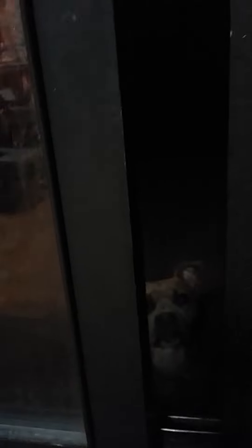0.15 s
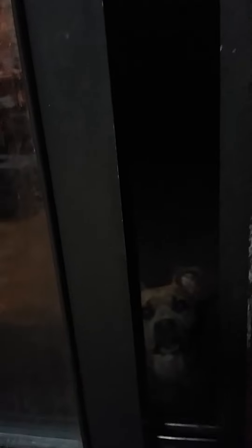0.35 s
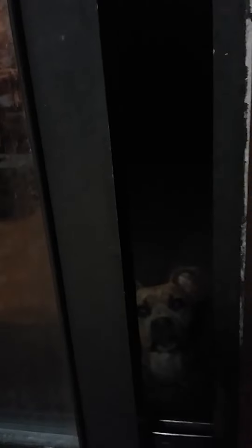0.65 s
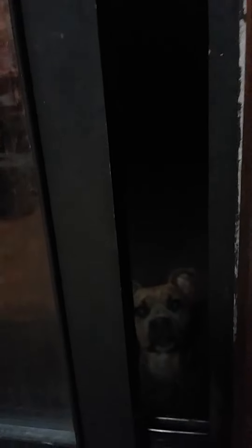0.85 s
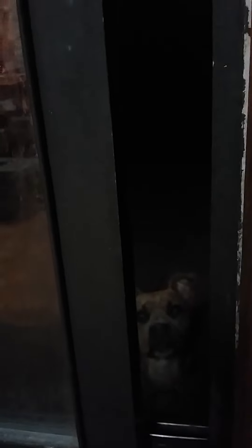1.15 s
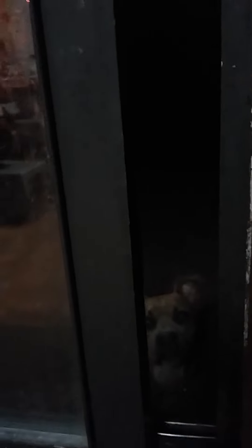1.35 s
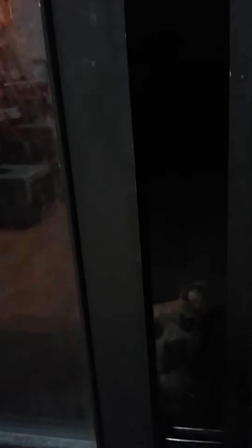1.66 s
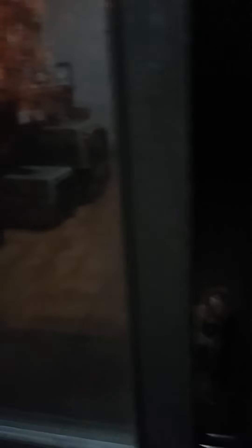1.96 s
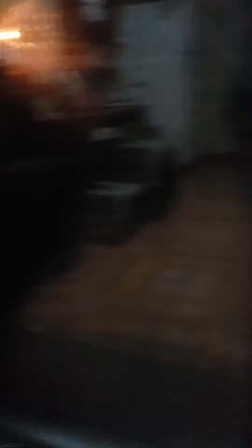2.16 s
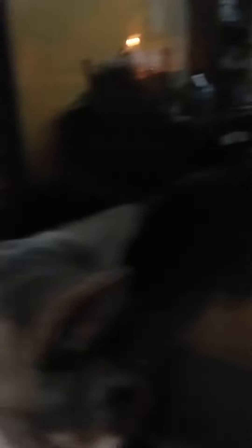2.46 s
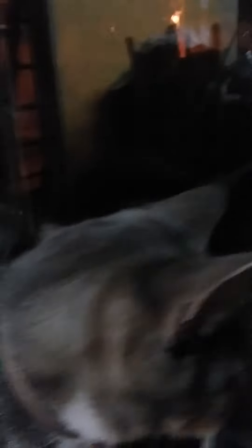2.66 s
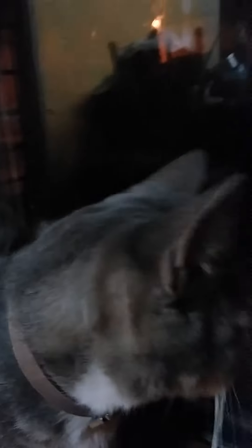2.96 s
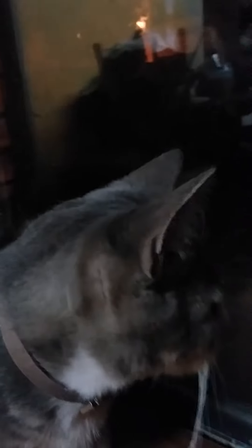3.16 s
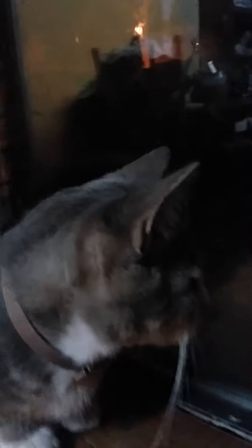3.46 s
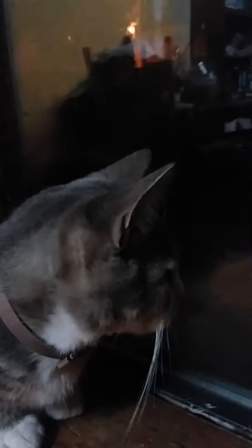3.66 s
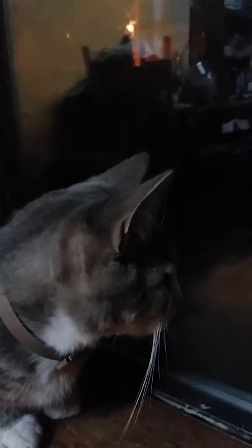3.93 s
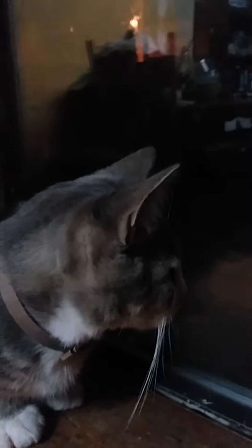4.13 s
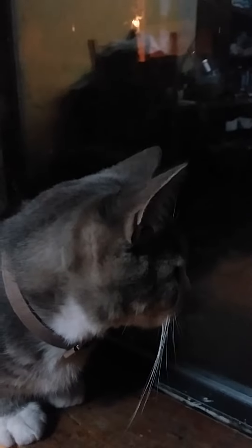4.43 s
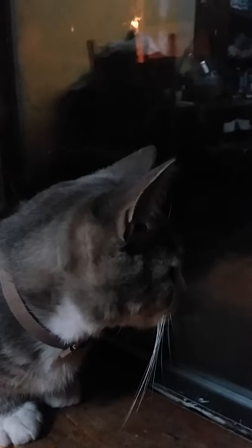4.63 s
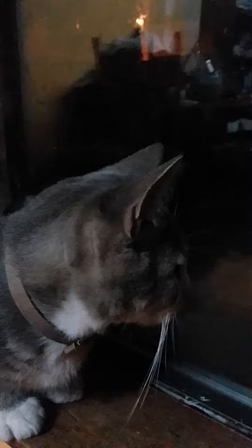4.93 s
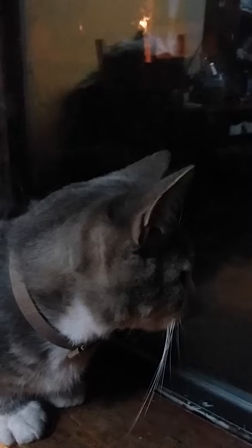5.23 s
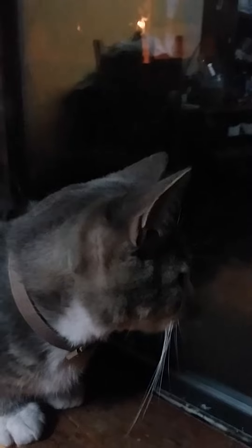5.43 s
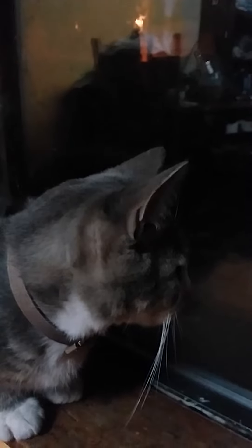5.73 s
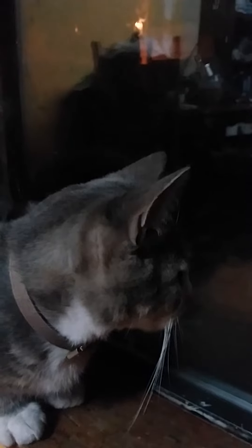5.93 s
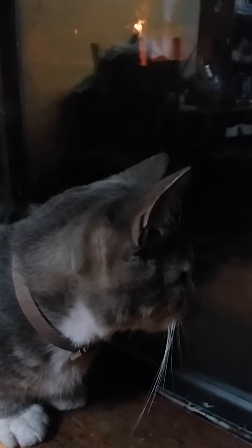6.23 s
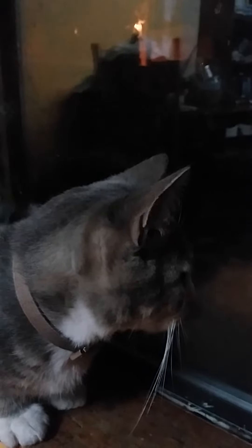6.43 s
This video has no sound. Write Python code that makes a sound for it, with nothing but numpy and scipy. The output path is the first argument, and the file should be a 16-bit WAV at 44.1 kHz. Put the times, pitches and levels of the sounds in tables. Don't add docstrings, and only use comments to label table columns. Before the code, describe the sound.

Four loud firecracker bangs in a night street, heard through a door ajar, each slapping off house fronts and fading into low town rumble.

```python
import sys
import numpy as np
from scipy import signal
from scipy.fft import rfft, irfft, next_fast_len
from scipy.io import wavfile
from scipy.ndimage import uniform_filter1d

SR = 44100
rng = np.random.default_rng(int(sys.argv[2]) if len(sys.argv) > 2 else 0)


def output_pcm(signal):
    pcm = np.clip(np.atleast_2d(signal).T, -1, 1) * 32767
    wavfile.write(sys.argv[1], SR, np.round(pcm).astype(np.int16))


def gain_from_db(level_db):
    decades = np.asarray(level_db, float) / 20
    return 10 ** decades


N = 290619
LONG = next_fast_len(N)

# (time [s], peak [dB], pitch [Hz])
NEAR_BLASTS = [
    (1.12816, -.9, 740),
    (2.68369, -1.3, 720),
    (4.48556, -1.8, 720),
    (5.96479, -1.5, 740),
]
# (crack [dB], first 25 ms of scatter [dB], treble from the back row of houses [dB])
BLAST_FRONTS = [(-16, -7.5, -1), (-26, 1, 5.5), (-29.5, 1, 2), (-22, 3.5, 2.5)]
# (scatter [dB], tilt [dB per octave], treble [dB], treble linger [dB per s])
DOOR_GAP = [(-18.5, -0.5, 7.5, -3), (-20, 1, 2, -2.5), (-18, 0, 3, 9.5), (-21.5, 0.43, 4.5, -6)]
# (centre [Hz], width [Hz], level [dB])
GRIP = [
    [(900, 320, 3), (1500, 180, -2), (2450, 600, -3.5), (2970, 300, 1), (5130, 470, 3.5), (5670, 330, -4)],
    [(1460, 300, -3), (1900, 600, 3.5), (2530, 180, 2), (4100, 320, -6), (4690, 330, 1.5), (5050, 250, -6)],
    [(1250, 180, -3), (1500, 280, 2), (2940, 400, -2), (4700, 360, 2.5), (5750, 460, 0), (6700, 400, -0.5)],
    [(380, 94, -0.5), (2340, 350, 3), (4000, 240, -5), (4600, 400, 3.5), (6100, 360, -3), (6570, 370, 6.5),
     (9000, 500, 3)],
]
PLACES_M = [2.2, .1, -2, -.4]
# (frequency [Hz], level [dB per Hz])
BLAST_COLOUR = [(20, -47), (70, -16.5), (150, -13), (300, -1.5), (480, -2), (780, -2), (1050, -6),
                (1400, -12), (2400, -15.5), (3200, -22), (5000, -26.5), (7000, -28), (10000, -27.5),
                (16000, -41)]
# (delay [s], extra delay up the street [s per m], pitch [Hz], length [cycles], sign)
MIRRORS = [
    (.00286, -.00008, 700, .9, 1),
    (.0959, .001, 650, 1.3, -1),
    (.2289, .0015, 1550, .75, 1),
]
# (sill [dB], far wall [dB], end wall [dB])
RETURN_LEVELS = [(-13, -6.5, -19), (-8, -9, -15.5), (-8, -7.5, -19), (-14, -9, -23)]
# (time [s], peak [dB], pitch [Hz], length [cycles])
SLAPS = [(1.133, -32.5, 2950, 5.5), (1.155, -15, 520, 1.4), (1.172, -13.5, 890, 2.5),
         (1.173, -29, 3030, 5.6), (1.185, -11.5, 740, 3), (1.233, -16, 450, 2.1), (1.243, -22, 790, 3),
         (1.255, -18, 744, 3.3), (2.192, -43, 287, 2), (2.692, -4.5, 1410, 0.72), (2.722, -8, 710, 1.25),
         (2.741, -10, 710, 0.88), (3.200, -38, 400, 0.72), (4.493, -15, 1200, 0.67), (4.525, -18, 800, 2.5),
         (4.536, -21.5, 800, 1.8), (4.585, -20, 600, 1), (4.711, -22, 5000, 0.82),
         (5.973, -5.5, 1320, 0.45), (5.977, -15, 696, 0.8), (6.004, -9, 740, 1.8), (6.016, -10, 756, 1),
         (6.384, -40, 450, 1.1), (6.429, -37, 500, 0.8)]
# (first bounce [s], gap [s], peak [dB], pitch [Hz], length [cycles])
FLUTTERS = [
    (1.9222, 0.0142, -34.5, 218, 1.8),
    (3.246, .0245, -40, 1300, 1.1),
]
# (delay [s], spread [s], body [dB], treble [dB])
HOUSE_ROWS = [
    (.010, .005, 3.5, 1),
    (0.049, .011, 3, 4.5),
    (.086, .008, -2, -0.5),
    (.11, .02, 0.5, 0.5),
    (.152, .022, 3.5, 1),
]
# (time [s], level [dB], tilt [dB per octave],
# t60 [s], ringing [Hz])
POPS = [(1.696, -58, 5, 0.12, 6000), (3.955, -62, 8.5, 0.51, 1780), (5.210, -57.5, 4.5, 0.21, 2650),
        (5.230, -57.5, 4, .3, 6700), (5.554, -54.5, 7.5, 0.28, 6700), (5.595, -59, 4, 0.4, 6700),
        (5.889, -58, 4.5, 0.31, 6500), (6.445, -53, 3, .2, 6700), (6.539, -47, 4, 0.31, 1590),
        (6.540, -52, 2.5, 0.24, 3530), (6.540, -67, -1, 0.28, 6800), (3.244, -49, 0.5, 1.2, 1400)]
# (time [s], peak [dB], pitch [Hz], scatter [dB], tilt [dB per octave])
FAR_THUMPS = [
    (1.9118, -26.5, 228, -48, -6.5),
    (3.242, -34.5, 302, -50, 0),
    (6.424, -39.5, 400, -59, 6),
]
# (time [s], level [dB])
TOWN_LEVEL = [(0, -56), (.95, -56.5), (1.12, -59.5), (1.7, -60), (2.15, -53), (2.67, -57.5), (3.5, -54),
              (3.8, -59), (4.15, -57), (4.47, -59.5), (5.2, -54), (5.5, -60.5), (5.85, -53), (6.59, -57.5)]
# (frequency [Hz], level [dB per Hz])
TOWN_COLOUR = [(20, -24), (50, -20), (80, -12.5), (108, -4.5), (150, -6.5), (320, -1), (400, -8.5),
               (860, -14), (1000, -19.5), (1600, -24), (2100, -30.5), (3050, -35), (3500, -39),
               (20000, -67.5)]
# (centre [Hz], width [Hz], level [dB])
TOWN_HUM = [(2750, 230, 3), (440, 80, 1.5)]
# (frequency [Hz], level [dB per Hz])
HISS_COLOUR = [(20, -29.5), (2000, -4), (4000, -0.5), (7000, -0.5), (11000, 2.5), (16000, 2.5),
               (22000, 0.5)]
# (centre [Hz], width [Hz], level [dB])
ROOM = [(72, 99, 2.5), (199, 9.9, 0), (314, 19, 4), (498, 30, 1.5), (620.4, 21, 3.5), (690, 22, 2.5),
        (776, 34, 1.5), (885, 37, 1.5), (1780, 58, 0.5), (2300, 150, 1.5), (2650, 60, -0.5),
        (2900, 150, -1.5)]
# (frequency [Hz], level [dB])
PHONE = [(15, -37.5), (60, 1), (2950, 0.5), (3250, -5.5), (4080, -11.5), (4450, -9), (4900, -9),
         (5600, -10.5), (6200, -12.5), (6800, -9.5), (7600, -14), (11000, -22.5), (14000, -33),
         (22000, -38)]
BANDS_HZ = 45 * 2. ** np.arange(9)

PULL_S = .02
STREET_S = 1.1
AIR_DB_PER_S = 42
BUILD_S, BUILD_DB = 0.011, -4
BODY_DB, BODY_DB_PER_S = 1, 70
TOP_DB, TOP_HOLD_S, TOP_DB_PER_S = -4, 0.21, 102.5
LATE_DB, LATE_DB_PER_S = -12.5, 36
BACK_ROW_S, BACK_ROW_SPREAD_S = .15, 0.03
STREET_END_S, STREET_END_DB = 0.27, -2
LEDGE_DB = -3
FLUTTER_LOSS_DB = 1.5
TICK_S, TICK_DB, TICK_HZ, TICK_CYCLES = 2.1615, -42, 1700, .7
LOW_RING_DB, HIGH_RING_DB = 11, 5
FAR_TREBLE_DB = -26
RUMBLE_TOP_DB, HISS_DB = 3, -83
EARLIER_BLAST_S = -.9
GAIN_HOLD_S, GAIN_RISE_S, GAIN_LIFT_DB, GAIN_FALL_S = 1.19, 0.55, 8, .35
TOWN_FOLLOWS_GAIN, TOP_FOLLOWS_GAIN = 0.76, .1


def slope(spectrum, count):
    hz = np.fft.rfftfreq(count, 1 / SR) + 1e-3
    at, db = np.transpose(spectrum)
    return hz, np.interp(np.log(hz), np.log(at), db)


def colour(x, spectrum, peaks=()):
    hz, gain_db = slope(spectrum, count=len(x))
    for centre, width, top in peaks:
        gain_db += top * np.exp(-.5 * (2 * (hz - centre) / width) ** 2)
    shaped = rfft(x) * gain_from_db(gain_db)
    return shaped / np.std(irfft(shaped, len(x))), hz


def octaves(shaped, hz, count):
    place = np.clip(np.log2(hz / BANDS_HZ[0]), 0, len(BANDS_HZ) - 1)
    return [irfft(shaped * np.maximum(1 - abs(place - k), 0), count) for k in range(len(BANDS_HZ))]


def walk(rate, count):
    hold = int(SR / rate)
    steps = np.repeat(rng.standard_normal(count // hold + 1), hold)
    return 0.91 * uniform_filter1d(steps, hold)[:count]


def add(out, s, x):
    i = int(s * SR)
    out[i:i + len(x)] += x[:len(out) - i]


def gain_lift(t):
    lift = np.zeros(len(t))
    for s in [EARLIER_BLAST_S] + [row[0] for row in NEAR_BLASTS]:
        since = t - s
        held = np.interp(s, t, lift)
        creep = GAIN_LIFT_DB * (1 - np.exp(-np.maximum(since - GAIN_HOLD_S, 0) / GAIN_RISE_S))
        lift = np.where(since > 0, creep + held * np.exp(-abs(since) / GAIN_FALL_S), lift)
    return lift


def night():
    t = np.arange(LONG) / SR
    body = np.interp(t, *np.transpose(TOWN_LEVEL))
    lift = gain_lift(t)
    shaped, freqs = colour(rng.standard_normal(LONG), TOWN_COLOUR, ROOM + TOWN_HUM)
    town = 0
    for hz, band in zip(BANDS_HZ, octaves(shaped, freqs, count=LONG)):
        db = body + TOWN_FOLLOWS_GAIN * lift
        db = db + (hz > 1000) * (RUMBLE_TOP_DB + TOP_FOLLOWS_GAIN * lift)
        swell = min(600 / hz, 1.5) * walk(14, count=LONG)
        flicker = 1.1 * walk(55, count=LONG)
        town = town + band * gain_from_db(db + swell + flicker)
    hiss = irfft(colour(rng.standard_normal(LONG), HISS_COLOUR)[0], LONG) * gain_from_db(HISS_DB + lift)
    return town[:N], hiss[:N]


def blast(hz, cycles):
    t = np.arange(-PULL_S * SR, .02 * SR) / SR * hz
    swell = np.exp(-.5 * ((t + .17) / (.44 * cycles)) ** 2)
    front = np.clip((t + .8 * cycles) / (.3 * cycles), 0, 1)
    return -swell * front * np.cos(2 * np.pi * t)


def street(t, bright):
    body = BODY_DB - BODY_DB_PER_S * t + BUILD_DB * np.clip(1 - t / BUILD_S, 0, 1)
    top = TOP_DB - TOP_DB_PER_S * np.maximum(t - TOP_HOLD_S, 0)
    for lag, spread, body_db, top_db in HOUSE_ROWS:
        bump = np.exp(-.5 * ((t - lag) / spread) ** 2)
        body = body + body_db * bump
        top = top + top_db * bump
    early = (1 - bright) * body + bright * top
    early = early + STREET_END_DB * np.clip((t - STREET_END_S) / .02, 0, 1)
    late = LATE_DB - LATE_DB_PER_S * t
    return 10 * np.log10(gain_from_db(early) ** 2 + gain_from_db(late) ** 2)


def scatter(db, tilt, treble_db, early_db, peaks, linger_db=0, back_db=0, grain_db=1.5, patchy_db=1.0):
    count = next_fast_len(int(STREET_S * SR))
    t = np.arange(count) / SR
    echoes = rng.standard_normal(count) * gain_from_db(grain_db * walk(700, count=count))
    start = gain_from_db(early_db * np.clip((.032 - t) / .012, 0, 1)) * np.minimum(t / .001, 1)
    back_row = np.exp(-.5 * ((t - BACK_ROW_S) / BACK_ROW_SPREAD_S) ** 2)
    out = 0
    for hz, band in zip(BANDS_HZ, octaves(*colour(echoes, BLAST_COLOUR, peaks), count=count)):
        bright = np.clip(np.log2(hz / 800) / 3.05, 0, 1)
        fade = street(t, bright) - AIR_DB_PER_S * (hz / 9870.0) ** 2 * t
        fade += back_db * bright * back_row
        tone = tilt * np.log2(hz / 700) + treble_db * (hz > 4000) + linger_db * bright * t
        out = out + band * gain_from_db(db + tone + fade + patchy_db * walk(40, count=count))
    return out * start


def near_crackers():
    out = np.zeros(N)
    for shot, gap, front, grip in zip(NEAR_BLASTS, DOOR_GAP, BLAST_FRONTS, GRIP):
        s, db, hz = shot
        wet_db, tilt, treble_db, linger_db = gap
        crack_db, early_db, back_db = front
        add(out, s - PULL_S, gain_from_db(db) * blast(hz, 1))
        add(out, s - PULL_S + .0016, -gain_from_db(-13) * blast(310, 1.1))
        crack = blast(3100, 1.2) + blast(5200, 1.2) + blast(7200, 1.2)
        add(out, s - PULL_S - .0006, gain_from_db(crack_db) * crack)
        tail = scatter(wet_db, tilt, treble_db, early_db, ROOM + grip, linger_db, back_db)
        add(out, s - .0008, tail)
    return out


def returns():
    out = np.zeros(N)
    add(out, TICK_S - PULL_S, gain_from_db(TICK_DB) * blast(TICK_HZ, TICK_CYCLES))
    for (s, *_), place, levels in zip(NEAR_BLASTS, PLACES_M, RETURN_LEVELS):
        for (lag, per_m, hz, cycles, sign), db in zip(MIRRORS, levels):
            add(out, s + lag + per_m * place - PULL_S, sign * gain_from_db(db) * blast(hz, cycles))
    return out


def walls(ring_s=0.0029):
    out = np.zeros(N)
    t = np.arange(int(.04 * SR)) / SR
    bounces = [(s + k * gap, db - k * FLUTTER_LOSS_DB, hz, cycles)
               for s, gap, db, hz, cycles in FLUTTERS for k in range(4)]
    for s, db, hz, cycles in SLAPS + bounces:
        ledges = rng.standard_normal(len(t)) * np.exp(-t / ring_s) * gain_from_db(LEDGE_DB) * np.sqrt(hz / SR)
        ledges[0] = 1
        add(out, s - PULL_S, gain_from_db(db) * np.convolve(blast(hz, cycles), ledges))
    return out


def pops():
    out = np.zeros(N)
    t = np.arange(2 ** 14) / SR
    for s, db, tilt, t60, ring_hz in POPS:
        ring_db = LOW_RING_DB if ring_hz < 4000 else HIGH_RING_DB
        shaped, hz = colour(rng.standard_normal(len(t)), BLAST_COLOUR, [(ring_hz, 900, ring_db)])
        tilt_db = tilt * np.log2(np.clip(hz, 100, 7000) / 1500)
        burst = irfft(shaped * gain_from_db(tilt_db), len(t))
        add(out, s, burst / burst.std() * gain_from_db(db - 60 * t / t60) * np.minimum(t / .001, 1))
    return out


def far_crackers(cycles=1.7):
    out = np.zeros(N)
    for s, db, hz, wet_db, tilt in FAR_THUMPS:
        add(out, s - PULL_S, -gain_from_db(db) * blast(hz, cycles))
        add(out, s - 1 / hz, scatter(wet_db, tilt, FAR_TREBLE_DB, -1, ROOM))
    return out


def scene():
    town, hiss = night()
    air = town + near_crackers() + returns() + walls() + pops() + far_crackers()
    ports = gain_from_db(slope(PHONE, count=LONG)[1])
    heard = irfft(rfft(air, LONG) * ports, LONG)[:N]
    return (heard + hiss)[None]


def top_cut(x):
    return signal.sosfilt(signal.butter(12, 15750, fs=SR, output="sos"), x)


def record(dry):
    rounded = np.tanh(.5 * dry) / .5 - .0004
    return top_cut(rounded)


dry = scene()
out = record(dry)
output_pcm(out)
```